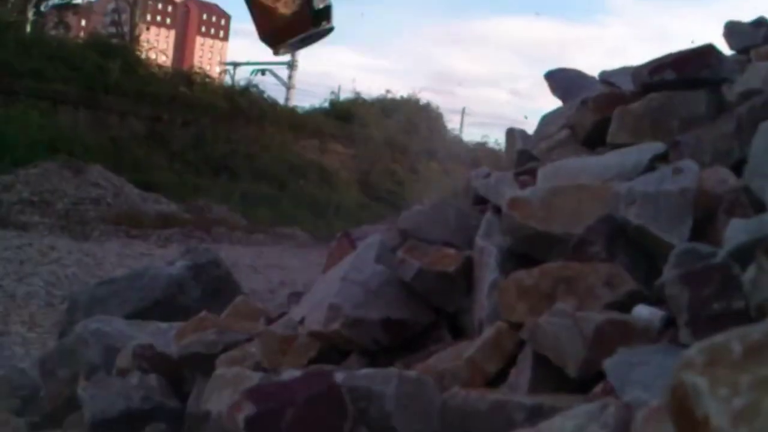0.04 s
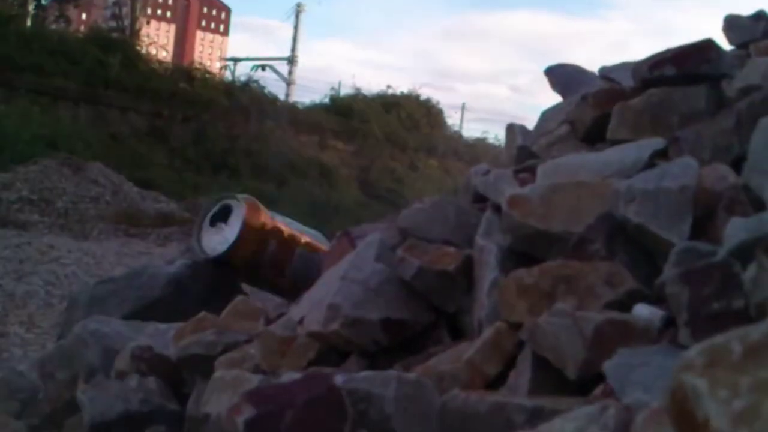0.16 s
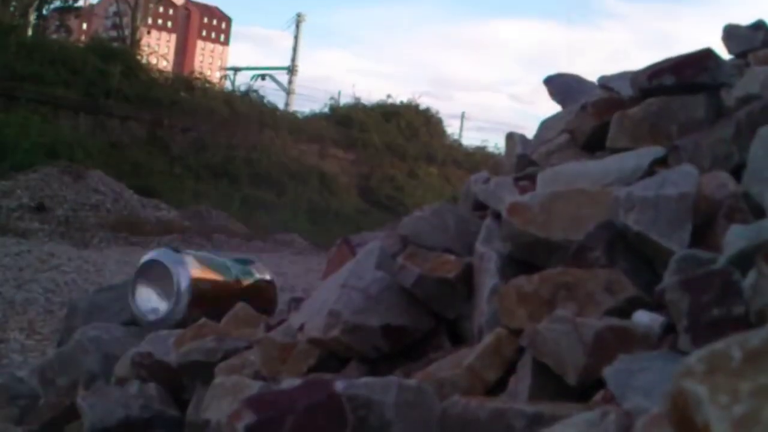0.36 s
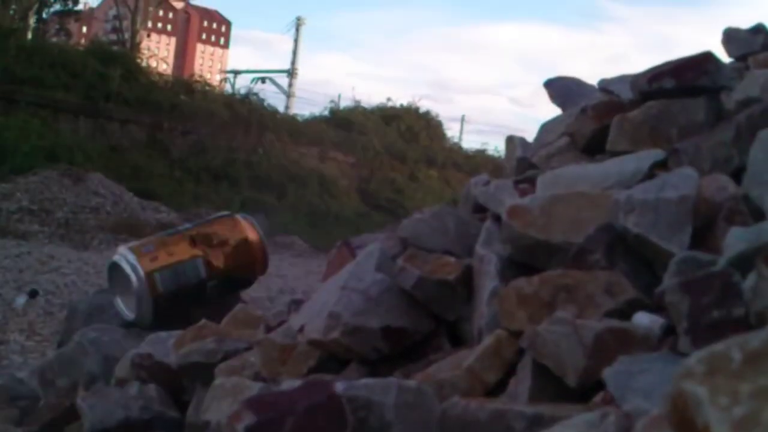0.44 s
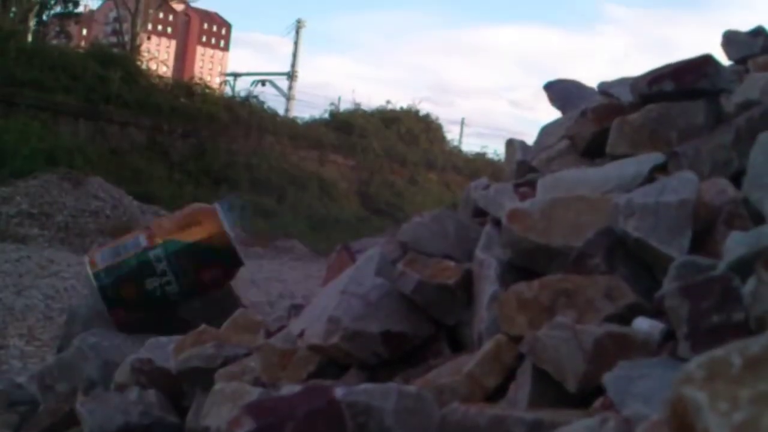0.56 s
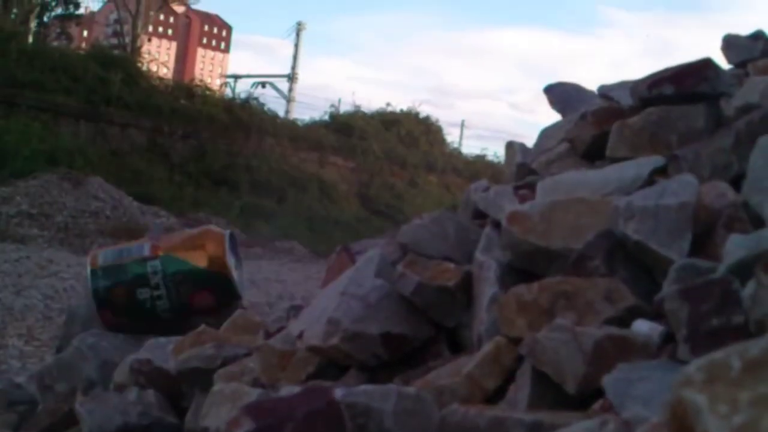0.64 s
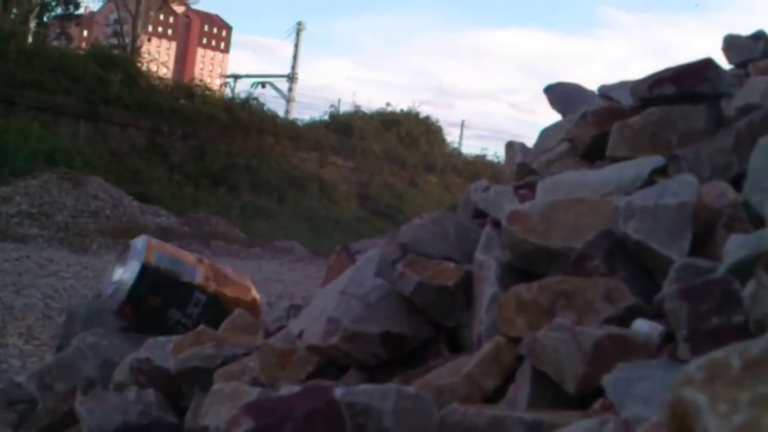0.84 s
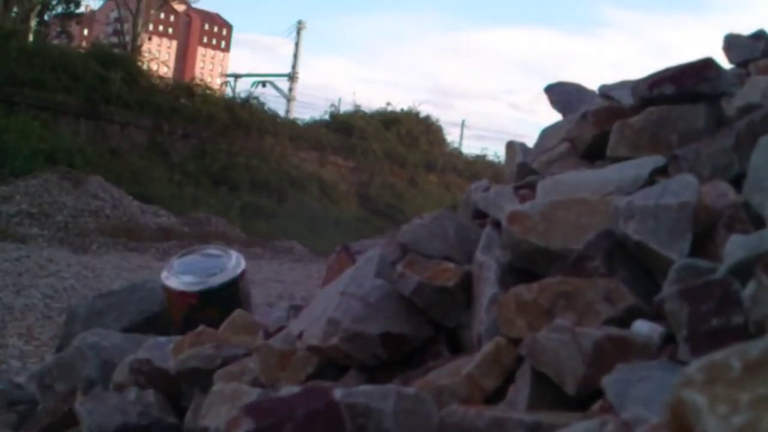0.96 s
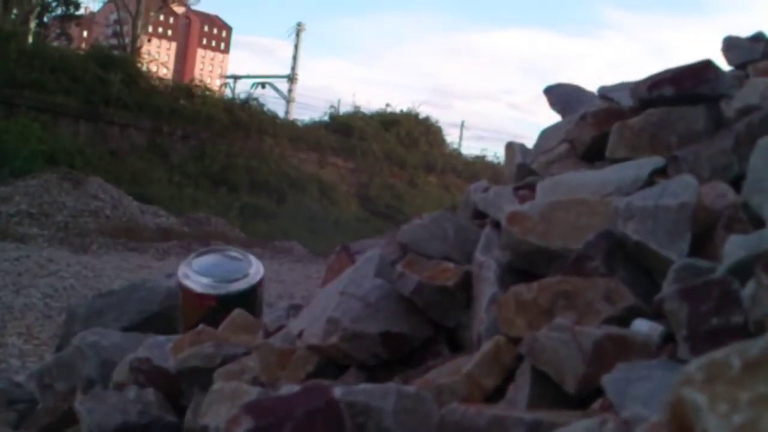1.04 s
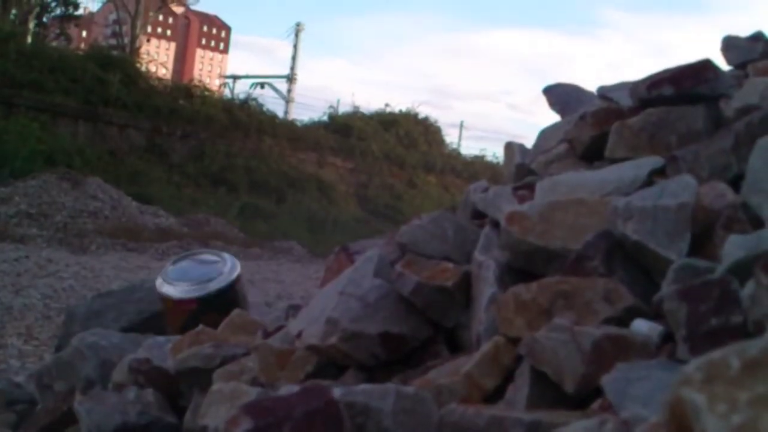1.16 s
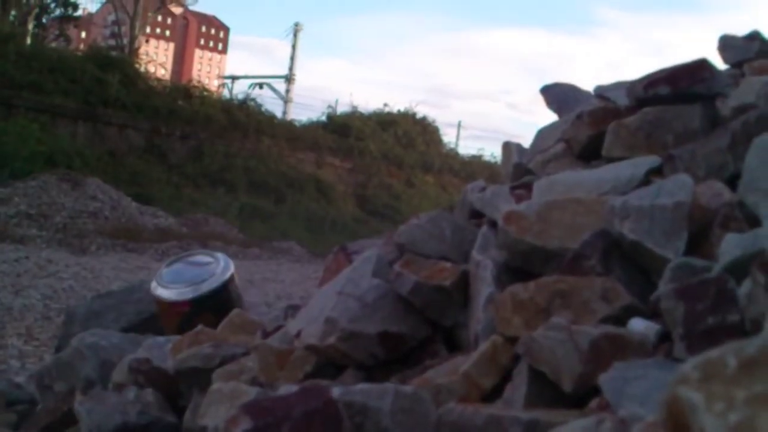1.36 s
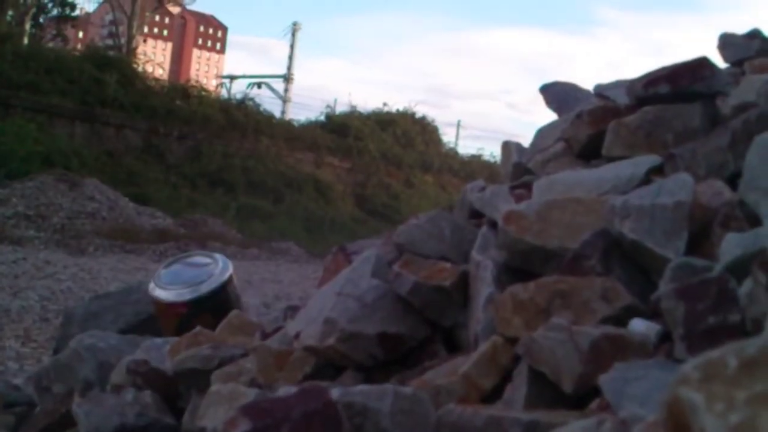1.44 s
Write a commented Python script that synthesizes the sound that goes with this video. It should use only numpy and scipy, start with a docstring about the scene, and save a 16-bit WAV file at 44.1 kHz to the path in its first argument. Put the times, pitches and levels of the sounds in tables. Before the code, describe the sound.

An empty metal can clatters on rocks outdoors. First, the faint echo of a distant bang dies away with a few ticks of grit. At about 0.2 seconds the can lands with a hard crunch, then bounces with ringing clanks and short scrapes, knocking more firmly around 0.4 and 1 second, and settling by 1.3 seconds. Underneath, soft dust patter, airy hiss and low microphone wind fade.

```python
"""First come the dying echo of a distant bang and a few ticks of falling grit. Then an empty drink can
lands on broken rock with a hard crunch as its thin wall dents. It tumbles to rest, and every touch makes
the metal ring and scrape. Behind it fine dust patters down, the open air hisses, and a low rumble of
wind on the microphone fades."""
import sys
import numpy as np
from scipy import signal
from scipy.fft import rfft, irfft
from scipy.io import wavfile

SR = 44100
rng = np.random.default_rng(int(sys.argv[2]) if len(sys.argv) > 2 else 0)


def store_pcm(level_fs):
    """Save levels as 16-bit WAV."""
    pcm = np.round(np.clip(level_fs, -1, 1) * 32767).astype(np.int16)
    wavfile.write(sys.argv[1], SR, np.atleast_2d(pcm).T)


N = 66150
T = np.arange(N) / SR
FREQS_HZ = np.fft.rfftfreq(N, 1 / SR)

# centres of the low, middle and high range: f/Hz
RANGES_HZ = [800, 2000, 5500]
# the can touches rock: t/s, low level/dB, middle level/dB, high level/dB, favoured pitch f/Hz
TOUCHES = [(.229, -24.5, -18, -23, 990), (.270, -25, -31, -47, 680), (0.294, -58, -55, -31.5, 4200),
           (.333, -28.5, -42, -71, 680), (.3495, -24.5, -25.5, -37.5, 597), (.385, -24.5, -27, -37, 626),
           (.450, -59, -39.5, -42, 2840), (.489, -35.5, -50, -58, 980), (.534, -25.5, -28.5, -39.5, 810),
           (.592, -30.5, -36.5, -53.5, 1250), (.6755, -31.5, -41.5, -53.5, 835),
           (.7615, -31, -32, -41, 1250), (.840, -31.5, -40.5, -47.5, 793), (.945, -51, -54.5, -58.5, 830),
           (1.036, -30, -28.5, -34.5, 1280), (1.070, -33.5, -35.5, -60, 695),
           (1.122, -36, -50.5, -54, 1334), (1.174, -49, -55, -51.5, 593), (1.190, -38, -44.5, -55.5, 736),
           (1.245, -41.5, -45, -81, 1243), (1.299, -53, -57, -68.5, 770)]
# the can's main tones: f/Hz, level/dB, t60/s (the time to fade by 60 dB)
CAN_TONES = [(585.7, -9, 0.1), (636.4, -7.5, 0.19), (661.3, -12, 0.22), (743.6, -5, 0.2), (767.7, -6, 0.21),
             (865, -6.5, 0.19), (965.5, -7.5, 0.21), (1227.6, -9, 0.21), (1377, -29, 0.1),
             (1502, -12, 0.26), (1703, -10.5, 0.23), (1749, -10.5, 0.12), (1894, -6, 0.13),
             (2317, -13.5, 0.18), (2416, -4, 0.096), (2505, -10, 0.15), (2681, -10, .23),
             (2950, -6.5, 0.13), (3176, -9.5, .25), (3980, -22.5, 0.34), (4370, -10.5, 0.059),
             (3940, -17, .15), (4640, 0, 0.067)]
# strength of the thin wall's many crowded tones: f/Hz, level/dB
WALL_LEVELS = [(1000, -23.5), (2000, -22.5), (3500, -16.5), (5500, -13), (8000, -21), (11000, -44),
               (15500, -44.5)]
def can_ring(wall_count=170, spot_db=6, spot_octaves=.12, detune=.013):
    """Each touch sets the can's tones ringing, slightly out of tune, and damps what still rings."""
    wall_hz = 1000 * 15.5 ** ((np.arange(wall_count) + rng.random(wall_count)) / wall_count)
    wall = [(hz, at_hz(WALL_LEVELS, hz), .19 * (2000 / hz) ** .3) for hz in wall_hz]
    hz, tone_db, t60 = np.transpose(CAN_TONES + wall)
    sides = pan(1.5 * rng.standard_normal(len(hz)))
    size = SR // 3
    out = np.zeros((2, N + size))
    for s, *levels, spot_hz in TOUCHES:
        # the struck spot favours tones near one pitch
        boost_db = spot_db * np.exp(-(np.log2(hz / spot_hz) / spot_octaves) ** 2 / 2)
        touch_db = at_hz(list(zip(RANGES_HZ, levels)), hz)
        db = tone_db + boost_db + touch_db + 1.5 * rng.standard_normal(len(hz))
        strength = from_db(db) * rng.choice([-1, 1], len(hz))
        bent_hz = hz * (1 + detune * rng.standard_normal(len(hz)))
        lags = rng.integers(0, SR // 1000, len(hz))   # tones start within 1 ms
        clicks = [signal.unit_impulse(size, lag) for lag in lags]
        rings = np.array([ring(click, f, decay) for click, f, decay in zip(clicks, bent_hz, t60)])
        start = int(s * SR)
        out[:, start:] *= from_db(-.5)   # damp the earlier ringing
        out[:, start:start + size] += (sides * strength) @ rings
    return out[:, :N]


# brief tones of the denting wall: f/Hz, level/dB, t60/s
DENT_TONES = [(648, -12.5, 0.052), (949, -13.5, 0.089), (1866, -8.5, 0.027), (3790, -23, 0.052),
              (5010, -34, 0.027), (5360, -29.5, .07), (5630, -7, 0.02), (7390, -31, 0.038),
              (8340, -11, 0.049)]
# the crunch's colour (how strong its lows and highs are): f/Hz, level/dB
CRUNCH_COLOUR = [(80, 1), (250, -4.5), (430, 5.5), (800, -5.5), (1500, -2), (3600, 1.5), (6000, 11.5),
                 (8500, 0.5), (11000, -4.5), (15500, -9)]
def landing(start_s=.2295):
    """The first blow buckles the wall: a crunch and a few tones that die quickly."""
    click = signal.unit_impulse(N, int(start_s * SR))
    dent = sum((-1) ** k * from_db(db) * ring(click, hz, t60)
               for k, (hz, db, t60) in enumerate(DENT_TONES))
    crunch = from_db(-8.5) * noise(CRUNCH_COLOUR)[0] * burst(start_s, t60=.051, hold=.0039)
    return dent + crunch


# colour of metal scraping stone: f/Hz, level/dB
SCRAPE_COLOUR = [(100, -28.5), (300, -19.5), (500, -17), (1000, -4.5), (2500, 0.5), (5500, 5), (9000, -2.5),
                 (15500, -25)]
def can_scrape():
    """Metal rasps briefly on stone at each touch, as bright as that touch."""
    rasp = rfft(noise(SCRAPE_COLOUR)[0])
    out = np.zeros(N)
    for s, *levels, _ in TOUCHES:
        touch_db = at_hz(list(zip(RANGES_HZ, levels)), FREQS_HZ)
        out += irfft(rasp * from_db(touch_db), N) * burst(s, t60=.057)
    return from_db(5) * out


# the heavier blows: t/s, level/dB
KNOCKS = [(0.351, -34.5), (.385, -28), (1.034, -27.5), (1.068, -37)]
# colour of a knock: f/Hz, level/dB
KNOCK_COLOUR = [(120, -21.5), (280, -10.5), (430, -4), (560, 5.5), (800, -16), (2000, -61)]
def knocks():
    """Heavier blows also knock dully on the stone."""
    return noise(KNOCK_COLOUR)[0] * sum(from_db(db) * burst(s, t60=.07) for s, db in KNOCKS)


# how much louder the can is on the left: f/Hz, level/dB
LEFT_LOUDER = [(200, 0), (700, 3), (1300, 0), (1900, 3), (2600, -7), (3500, -2), (5500, -1), (8500, 4),
               (13000, 11)]
# how far its wave is ahead on the left: f/Hz, phase/rad
LEFT_LEAD = [(100, 0), (800, .45), (1500, .5), (2200, .1), (2800, 1.7), (3700, 2.3), (5800, 2), (6500, 4),
             (9000, 4.3), (14000, 5)]
def among_rocks(can, tail_db=-23):
    """The can's sound arrives from the left, and the stones scatter it into a faint tail."""
    size = 2 * N
    hz = np.fft.rfftfreq(size, 1 / SR)
    tail = rng.standard_normal((2, N)) * burst(.0022, t60=.45)
    tail *= from_db(tail_db) / np.sqrt(np.sum(tail ** 2) / 2)
    direct = np.exp(-1j * np.array([[0], [1]]) * at_hz(LEFT_LEAD, hz))   # the right side lags
    panned = rfft(can, size) * pan(at_hz(LEFT_LOUDER, hz))
    return irfft(panned * (direct + rfft(tail, size)), size)[:, :N]


# bits of grit land: t/s, level/dB
GRIT_TICKS = [(0.031, -22), (0.0902, -33.5), (0.105, -34.5), (0.114, -26), (.122, -32), (.200, -43),
              (0.202, -49), (0.678, -37), (.814, -54), (1.469, -36.5)]
# colour of a tick: f/Hz, level/dB
GRIT_COLOUR = [(500, 7), (2500, -2.5), (6000, 6.5), (9000, -1), (15500, -8.5)]
def grit():
    """Falling stone chips land with tiny dry ticks."""
    return noise(GRIT_COLOUR, count=2) * sum(from_db(db) * burst(s, t60=.012) for s, db in GRIT_TICKS)


# colour of falling dust: f/Hz, level/dB
DUST_COLOUR = [(1000, -4.5), (3500, -4), (6000, -5), (8500, -8), (11000, -27.5), (15500, -40.5)]
def dust(grains_per_s=4200, spread_db=4.5, fade_db_per_s=11):
    """Fine grains patter onto the stones, ever more quietly."""
    grains = (rng.random((2, N)) < grains_per_s / SR) * rng.standard_normal((2, N))
    grains *= from_db(spread_db * np.minimum(rng.exponential(1, (2, N)), 4))   # a few stand out
    patter = irfft(rfft(grains) * from_db(at_hz(DUST_COLOUR, FREQS_HZ)), N)
    return from_db(-48.5 - fade_db_per_s * T) * rms_one(patter)


# colour of the echo: f/Hz, level/dB
ECHO_COLOUR = [(88, -34), (150, -3.5), (267, -7), (495, -2.5), (661, -3), (1030, -1), (2700, -10.5),
               (4290, -10), (15000, -42.5)]
def distant_echo(fade_db_per_s=74):
    """The echo of a bang dies away in the distance."""
    return from_db(-34.5 - fade_db_per_s * T) * noise(ECHO_COLOUR, count=2) * pan(-2)


# colour of the open air: f/Hz, level/dB
AIR_COLOUR = [(150, -6.5), (330, 1.5), (500, -2.5), (1300, -4), (3000, -15.5), (6000, -17), (10000, -28.5),
              (15000, -34)]
def open_air(fade_db_per_s=6):
    """The soft hiss of the outdoors slowly fades."""
    return from_db(-48.5 - fade_db_per_s * T) * noise(AIR_COLOUR, count=2)


# the rumble rises and falls: t/s, level/dB
RUMBLE_LEVELS = [(0, -43.5), (.18, -40), (.3, -45), (.52, -37.5), (.69, -38), (.78, -34.5), (.86, -43),
                 (.91, -37), (1.04, -50), (1.2, -48), (1.38, -46.5), (1.46, -45.5)]
# colour of the rumble: f/Hz, level/dB
RUMBLE_COLOUR = [(15, -2), (40, 0.5), (70, 2.5), (110, -7), (200, -13), (400, -24.5), (1000, -79.5)]
# short puffs of wind: t/s, length/s, level/dB
PUFFS = [(0.386, 0.024, -44.5), (0.48, 0.023, -36), (0.564, 0.024, -58), (0.641, 0.027, -40),
         (0.75, 0.064, -55.5), (.80, 0.01, -43), (0.917, 0.025, -42)]
# colour of a puff: f/Hz, level/dB
PUFF_COLOUR = [(50, -14), (120, -3), (220, 0), (380, -2), (600, -20), (1500, -50)]
def wind():
    """Wind on the microphone makes a low rumble and short puffs, mostly on the right."""
    rumble = from_db(np.interp(T, *np.transpose(RUMBLE_LEVELS))) * wide_noise(RUMBLE_COLOUR)
    swells = sum(from_db(db) * np.exp(-(2 * (T - s) / length) ** 2 / 2) for s, length, db in PUFFS)
    puffs = swells * wide_noise(PUFF_COLOUR)
    return rumble * pan(-9) + puffs * pan(-12)


def from_db(db):
    """Turn decibels into a number to multiply by."""
    return 10 ** (np.asarray(db) / 20)


def rms_one(x):
    """Scale a sound to an average strength (rms) of 1."""
    return x / np.sqrt(np.mean(x ** 2) + 1e-20)


def at_hz(points, hz):
    """Read between the rows of a table, giving each octave equal room."""
    f, value = np.transpose(points)
    return np.interp(np.log(np.maximum(hz, 1)), np.log(f), value)


def pan(db):
    """Left and right gains that make the left side louder by db."""
    return from_db(np.array([[.5], [-.5]]) * db)


def noise(colour, count=1):
    """Channels of noise with the given colour, at strength 1."""
    white = rng.standard_normal((count, N))
    return rms_one(irfft(rfft(white) * from_db(at_hz(colour, FREQS_HZ)), N))


def wide_noise(colour, alike=.5):
    """Stereo noise whose sides are partly alike."""
    left, right, both = noise(colour, count=3)
    return np.sqrt(1 - alike) * np.array([left, right]) + np.sqrt(alike) * both


def burst(start, t60, hold=0):
    """A level that jumps up, holds, then dies away; times are in seconds."""
    return (T >= start) * np.exp(-np.log(1000) * np.maximum(T - start - hold, 0) / t60)


def ring(clicks, hz, t60):
    """A click sets a pure, fading tone ringing."""
    decay, angle = np.exp(-np.log(1000) / (t60 * SR)), 2 * np.pi * hz / SR
    return signal.lfilter([0, np.sin(angle)], [1, -2 * decay * np.cos(angle), decay ** 2], clicks + 1e-18)


def scene():
    """The can among the rocks, the falling grit and the background."""
    can = can_ring() + can_scrape() + knocks() + landing()
    return among_rocks(can) + grit() + dust() + distant_echo() + open_air() + wind()


def record(dry):
    """The landing overloads the recorder, and the highest treble is cut."""
    treble_cut = signal.cheby2(12, 60, 16500, fs=SR, output="sos")
    return signal.sosfilt(treble_cut, np.clip(dry, -1, 1))


dry = scene()
out = record(dry)
store_pcm(out)
```